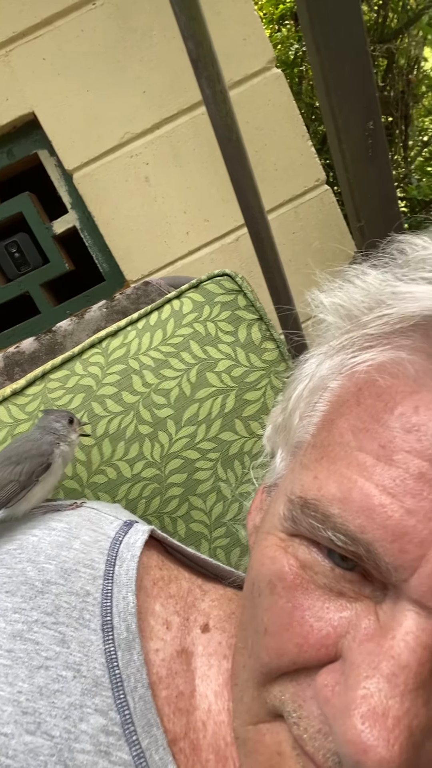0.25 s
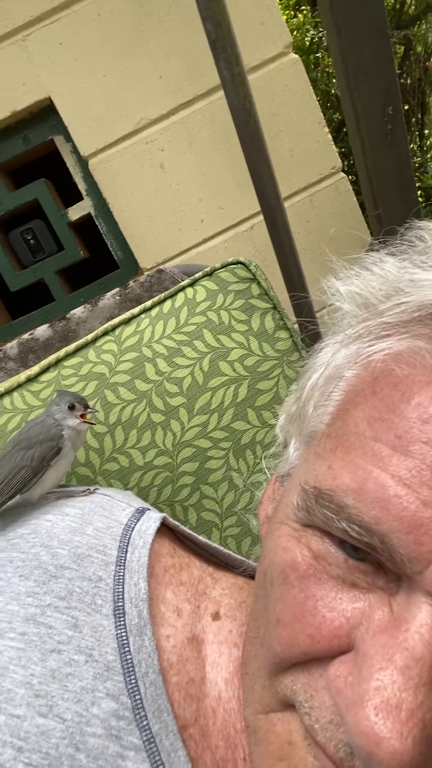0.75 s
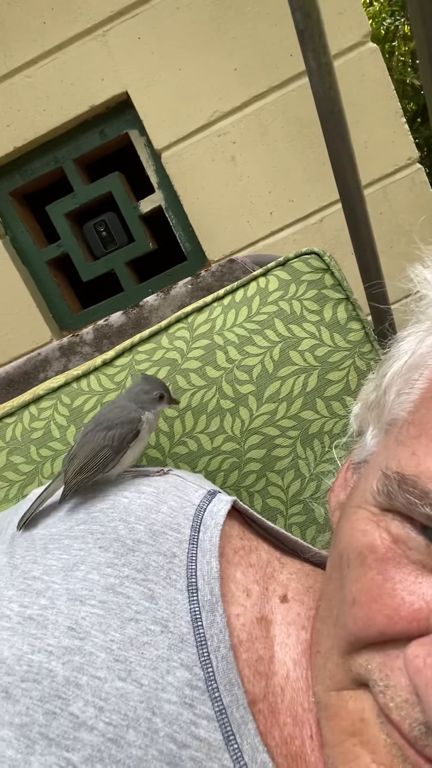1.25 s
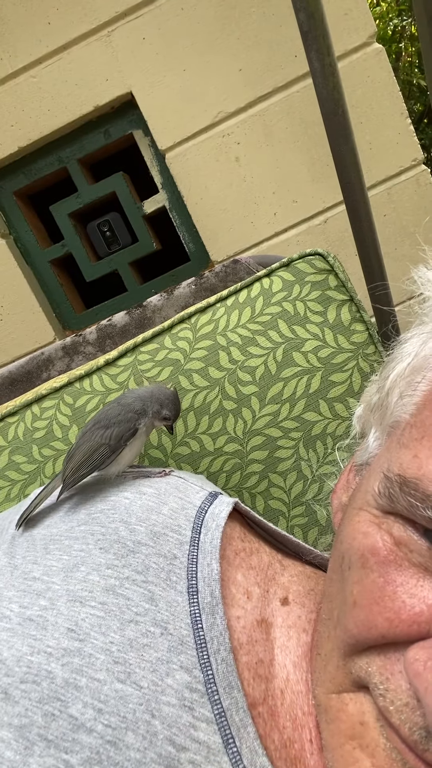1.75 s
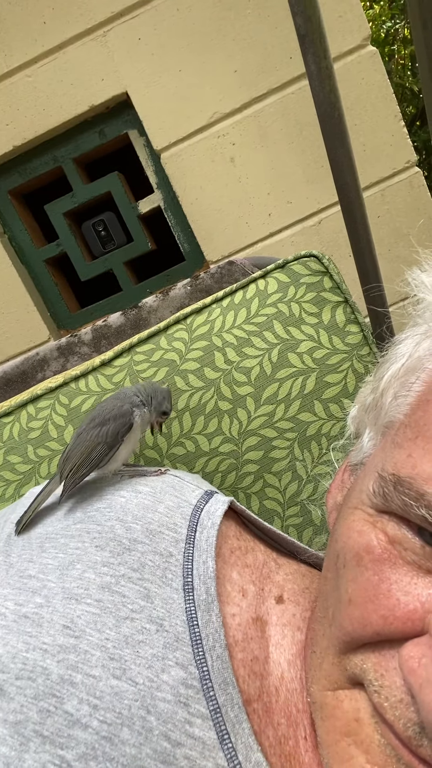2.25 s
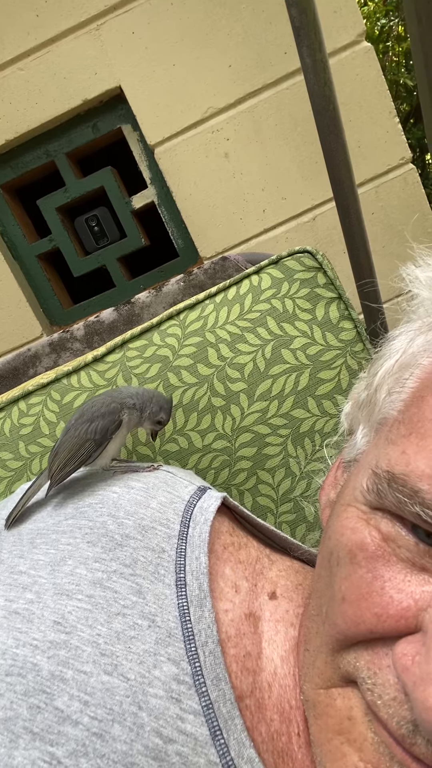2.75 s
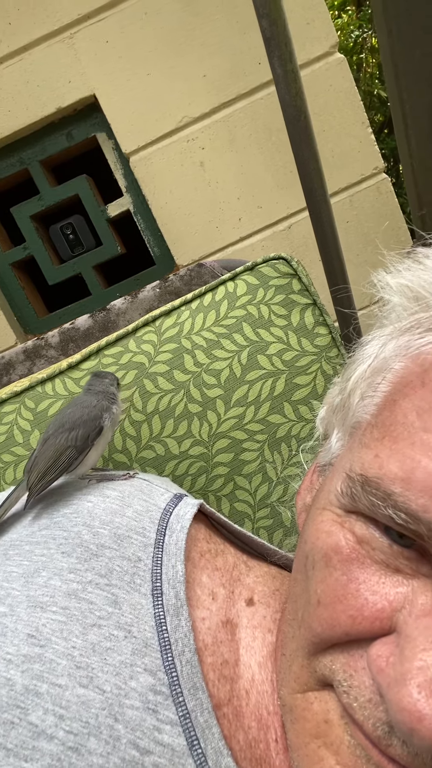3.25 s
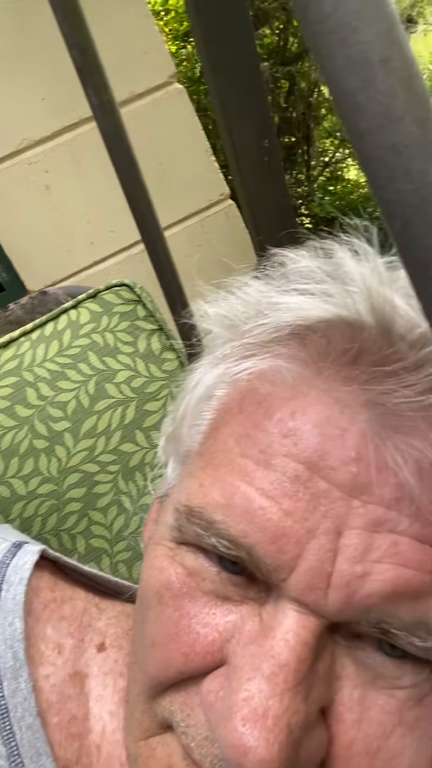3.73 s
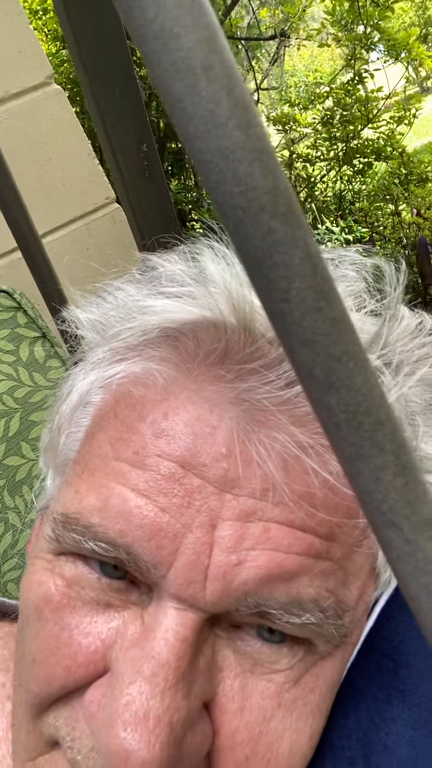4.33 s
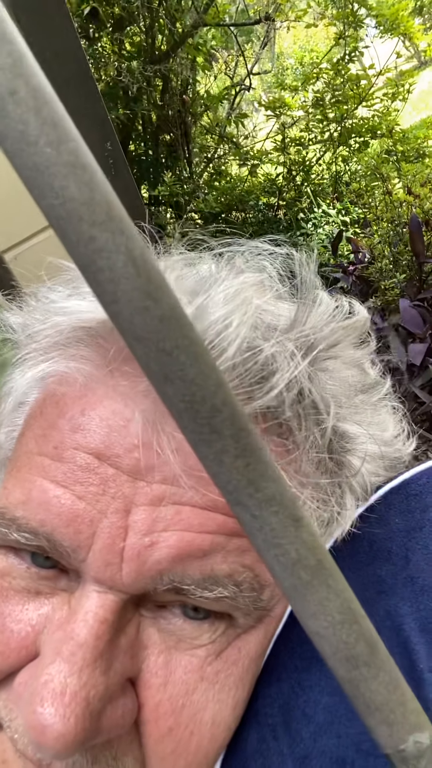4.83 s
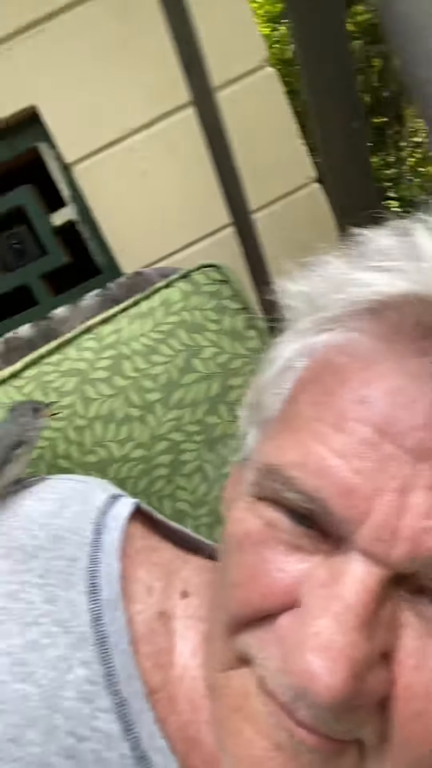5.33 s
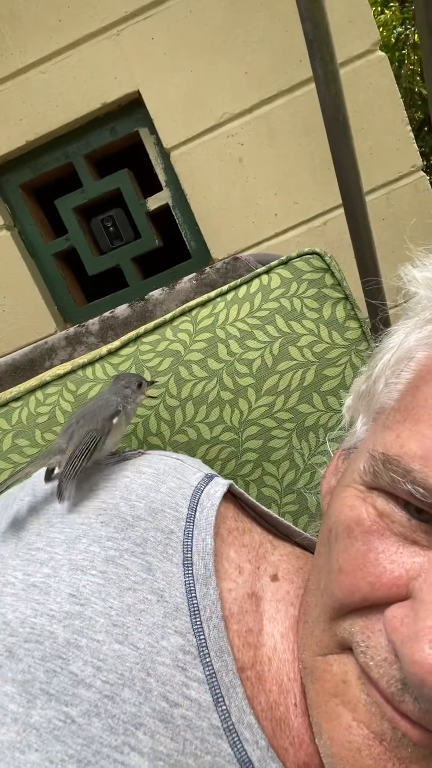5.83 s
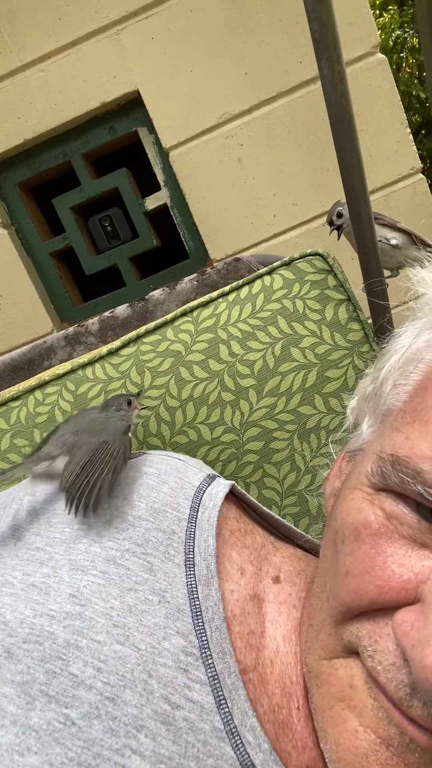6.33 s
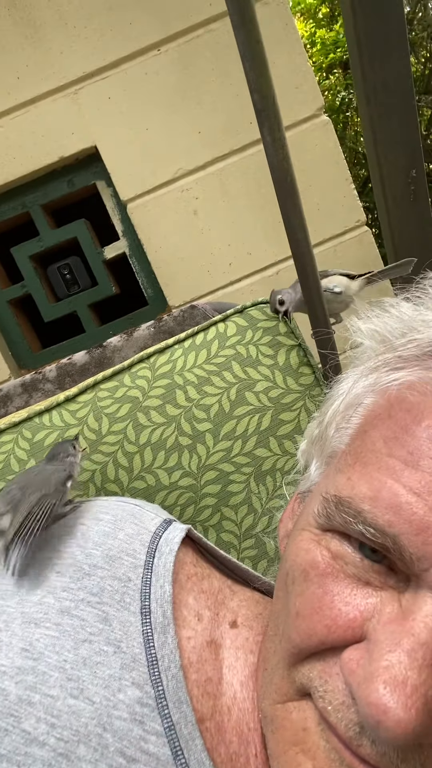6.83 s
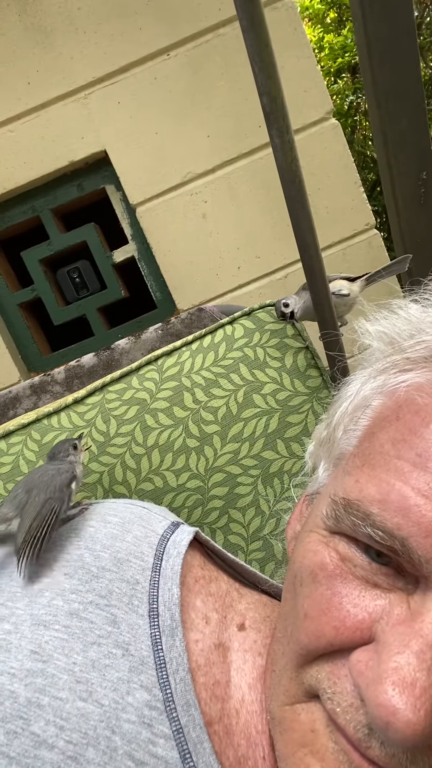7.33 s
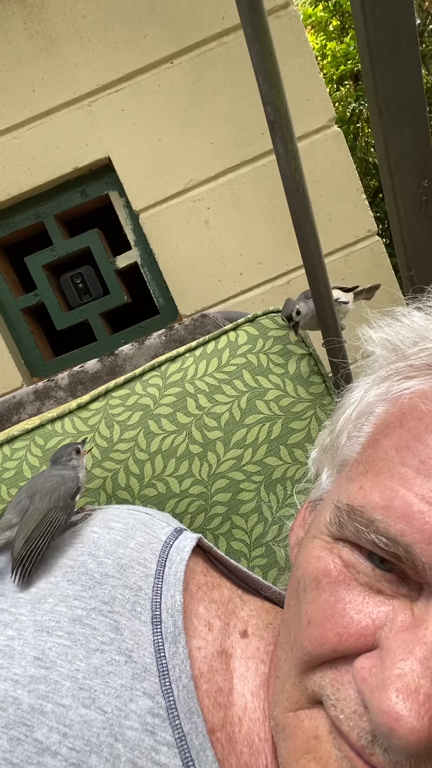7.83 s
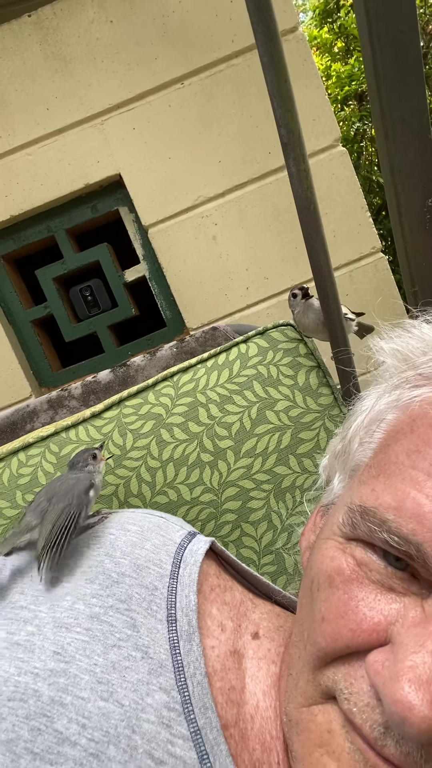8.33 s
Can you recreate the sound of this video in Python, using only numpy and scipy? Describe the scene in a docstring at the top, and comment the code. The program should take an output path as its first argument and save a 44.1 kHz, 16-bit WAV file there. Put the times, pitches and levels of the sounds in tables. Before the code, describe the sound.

On a quiet porch, titmice beg and scold near the microphone, with soft wing puffs, claw ticks and faint birds in the garden.

```python
"""On a porch, titmice beg and scold close to a two-port microphone.
A begging call is a whistle that sags and breaks into a falling rasp as two coupled syrinx sides mix.
Thin whistles hook downward; harsh scolds arch in pitch as a stack of harmonics frayed by noise.
Wings, claws and rustling feathers are shaped noise bursts; far birds glide and hiss in the garden,
over a faint low rumble of coloured noise."""
import sys
import numpy as np
from scipy import signal
from scipy.fft import rfft, irfft, next_fast_len
from scipy.io import wavfile
from scipy.ndimage import uniform_filter1d

SR = 44100
rng = np.random.default_rng(int(sys.argv[2]) if len(sys.argv) > 2 else 0)


def transcribe(signal):
    """Save signal, clipped to [-1, 1], as a 16-bit WAV file at the path in sys.argv[1]."""
    frames = np.atleast_2d(signal).T
    limited = np.clip(frames, -1, 1)
    pcm = np.round(limited * 32767).astype(np.int16)
    wavfile.write(sys.argv[1], SR, pcm)


N = 378378  # length in samples

# Garden air, noise colour: [f/Hz, relative spectral level/dB]
AIR = [(12, -50.5), (20, -47), (49, 1.5), (92, -4), (124, -5.5), (235, -19), (347, -18), (445, -28),
       (865, -20.5), (1210, -26), (1780, -23), (4820, -37.5), (6010, -67), (9110, -48), (15000, -62.5)]
# Likeness of the air at the two ports: [f/Hz, correlation/1]
AIR_SAME = [(60, 1), (130, 0.96), (290, 0.073), (640, 0), (3000, 0.05)]
AIR_DB = -55.5
# Level of the left port over the right for near sound: [f/Hz, level/dB]
PORT_BALANCE = [(50, -2), (300, 8.5), (900, 3.5), (2500, 1.5), (3400, 1.5), (4200, 3.5), (5000, -0.5),
                (6700, -0.6), (9000, 0)]
# Phase of the left port against the right, negative for a lag: [f/Hz, phase/rad]
PORT_PHASE = [(250, 0), (600, -1.3), (1100, -0.5), (2300, -0.6), (3050, -2), (3600, -1.07), (4250, -1.3),
              (4550, -2.5), (5400, -3), (7200, -4.5), (8600, -5), (10500, -6.5), (14500, -9)]
# Reverberation of the porch: [f/Hz, decay time T60/s]
PORCH_T60 = [(200, 0.2), (2000, 0.57), (4000, 0.26), (7500, 0.22), (14000, 0.26)]
EDGE_HZ = 15500  # upper band limit

# Thin hissy calls from the trees: [t/s, base level/dB, decay time T60/s]
FAR_HISSES = [(1.235, -60.5, 0.88), (3.534, -57.5, 0.6), (4.151, -49, 0.46), (5.521, -59, 0.78),
              (7.735, -57.5, 0.51)]
# Colour of those calls: [f/Hz, relative level/dB]
HISS_BAND = [(4800, -62), (5700, 12), (6800, 7.5), (7800, 9), (8150, 4.5), (8700, -49.5), (14000, -17),
             (15500, -40)]
# Far gliding whistles: [t/s, length/s, start f/Hz, end f/Hz, base level/dB]
FAR_WHISTLES = [(1.91, .19, 4700, 4050, -68), (7.06, .13, 5200, 2900, -69), (7.18, .22, 2080, 2170, -68),
                (7.43, .11, 5200, 2900, -65), (7.53, .25, 2000, 2170, -63), (7.79, .12, 5200, 2850, -66),
                (7.89, .19, 1920, 2090, -63), (8.14, .09, 5300, 3700, -65)]
FAR_ARCH = .025  # share by which the pitch rises in mid-note

# Wing beats: [t/s, air push base level/dB, feather swish base level/dB]
WINGBEATS = [(4.518, -40.5, -50), (4.551, -38.5, -48), (4.598, -41, -51), (4.641, -43.5, -48.5),
             (4.68, -42.5, -54), (4.801, -41.5, -48), (4.84, -62, -72), (5.033, -47.5, -54),
             (5.064, -49, -55.5), (5.204, -49, -55.5), (5.249, -51.5, -53), (5.802, -46.5, -53),
             (5.846, -47, -45.5), (5.883, -44, -48.5), (5.908, -41.5, -46), (5.929, -49, -72.5),
             (8.429, -46.5, -54.5)]
# Colour of the air push: [f/Hz, relative level/dB]
PUSH = [(20, -28), (40, -4), (70, 0), (150, -5), (260, -13), (600, -46)]
# Colour of the feather swish: [f/Hz, relative level/dB]
SWISH = [(120, -5), (300, 11.5), (900, 5), (2000, -4.5), (5000, -22.5), (12000, -40), (15000, -40)]
# Feathers and cloth as the birds shift, one level curve per rustle: [t/s, base level/dB]
RUSTLES = [
    [(4.5, -78), (4.816, -73), (4.82, -53)],
    [(5.29, -71), (5.67, -63), (5.7, -81)],
    [(8.39, -57), (8.522, -57.5), (8.57, -69)],
]
# Claws and beaks: [t/s, base level/dB]
TICKS = [(0.042, -62.5), (0.6848, -54), (1.6117, -54.5), (1.6716, -53.5), (4.5268, -52), (4.774, -48.5),
         (5.374, -52), (5.5255, -47.5), (5.6191, -51), (5.9068, -40.5), (6.7789, -59), (8.4311, -38)]
# Colour of ticks and rustles: [f/Hz, relative level/dB]
TICK_COLOUR = [(800, -2.5), (3000, -2.5), (6000, -5.5), (9000, 4.5), (13000, 1), (15500, -11)]

# Begging calls: [t/s, whistle length/s, fall length/s, swell/s, rasp lead before the break/s,
# upper start f/Hz, upper end f/Hz, lower top f/Hz, lower end f/Hz, plunge/1 (1 even, more = steep at first),
# whistle level/dB, upper voice level after the break/dB, flare/dB, lower voice level/dB, rasp base level/dB,
# octave lock/1, share of the fall at which it locks/1, treble/dB]
SWEEPS = [ (0.187, 0.089, 0.16, 0.015, 0.037, 7195, 2803, 2614, 1382, 1.5, -25, -34, 21, -40.5, -36.5, 0.49, 0.24, 0),
          (0.695, .100, .117, .006, 0.011, 7430, 2930, 2348, 1486, 2.2, -20, -31, 23.5, -47.5, -35, 0.094, 0.29, -3),
          (1.328, 0.032, 0.15, .005, .027, 6464, 3037, 2705, 1962, .95, -28.5, -26, -6, -41.5, -41, .9, .33, -1.5),
          (2.252, .074, 0.16, 0.007, 0.027, 6960, 2777, 2480, 1459, 1.4, -29.5, -27.5, -17, -44, -38, 1, 0.49, -2),
          (2.968, .068, 0.16, 0.0071, .036, 7030, 3070, 2860, 1507, 1.25, -25.5, -32, -15, -39.5, -42.5, 0.7, 0.19, -1),
          (3.725, 0.11, 0.13, 0.057, 0.049, 7300, 2975, 2600, 1510, 2.1, -20, -27, 17, -43, -37, .2, .3, -2),
          (4.822, .058, 0.19, 0.022, .04, 6790, 2610, 2684, 1327, 1.9, -25, -33, 14.5, -42.5, -34.5, .45, 0.24, 4),
          (6.283, .07, 0.12, 0.032, 0.059, 6990, 3070, 2800, 1552, 0.88, -38, -34, 9.5, -38.5, -37, 0.95, .2, 5),
          ]
# Thin whistles with a downward hook: [t/s, length/s, start f/Hz, sag/(Hz/s), hook depth/Hz, level/dB,
# softer start/dB, undertone level/dB, raspy ending/s, rasp base level/dB]
WHISTLES = [ (5.728, 0.16, 7673, 7800, 1700, -21.5, -22, -85, 0.059, -38.5),
            (7.276, 0.1, 7590, 1000, 524, -30, -12.5, -89.5, .01, -79),
            (7.436, .123, 7660, 7610, 1340, -25.5, -18.5, -90, 0.02, -41),
            (8.063, 0.088, 7185, 9040, 150, -28.5, -11, -45.5, 0.055, -42), ]
# Harsh scolds: [t/s, length/s, crest after start/s, start f/Hz, crest f/Hz, end f/Hz, lower end f/Hz,
# upper level/dB, lower level/dB, rasp base level/dB, beak opening/1, treble/dB]
CHURRS = [ (5.119, 0.16, 0.13, 3016, 3975, 3720, 2444, -31.5, -40.5, -34.5, 0.02, 1.5),
          (5.959, 0.13, .075, 3485, 4140, 3810, 2560, -41.5, -65, -36.5, 0.06, 0.5),
          (6.526, 0.14, .095, 3154, 3795, 3660, 2410, -42.5, -55, -36, 0.14, 0.5),
          (8.209, 0.16, 0.051, 3797, 3985, 2927, 1300, -38.5, -44.5, -35.5, 1, 5.5), ]
# Throat with the beak wide open: [f/Hz, relative level/dB]
SWEEP_THROAT = [(500, -34), (1200, -22), (1700, -10), (3000, -10), (3900, 2), (5400, -14), (6300, -2.5),
                (7200, 0.5), (8600, 1.5), (9700, -6.5), (11000, -7.5), (13200, -10.5), (15500, -34)]
# Throat with the beak half shut: [f/Hz, relative level/dB]
CHURR_THROAT = [(500, -33.5), (1200, -21.5), (1700, -2.5), (2600, -6), (3100, 0), (3900, -1), (5000, -25.5),
                (6300, -12.5), (7200, -3), (8200, -9), (11000, -11), (13200, -22), (15500, -43.5)]
# Overtones of the upper voice by its pitch: [f/Hz, level/dB]
OVERTONES = [(2900, -18.5), (3500, -3), (4100, 0.5), (4700, -7.5), (5300, -17.5), (6200, -18), (7000, -0.5),
             (7600, 7)]
# Combination tones in the rasp: [multiple of upper/1, multiple of lower/1, relative level/dB]
MIXTURES = [(1, 0, 2), (2, 0, 2), (3, 0, -1), (0, .5, -2), (0, 1, -1), (0, 2, -2), (0, 3, -1), (0, 4, -1),
            (1, 1, -2), (1, 2, -3), (2, 1, -2), (3, 1, -3), (1, -1, -4)]
# Nine harmonics of a scold, the third on the upper voice: [multiple of upper/1, of lower/1, relative level/dB]
CHURR_STACK = [(k / 3, 0, 0) for k in range(1, 10)]
# Treble boost of a call: [f/Hz, share of the boost/1]
TREBLE_SHELF = [(8000, 0), (11000, 1)]

# Whistle and break: at BREAK_HZ the syrinx slackens and both voices fall
BREAK_HZ, BREAK_S = 6184, .025
SAG_CURVE = 1.25  # above 1 the whistle holds its pitch a moment before it sags
# The lower voice scoops up from a flatter, softer entry and is steady LOWER_SETTLED_S after the break
LOWER_ENTRY_S, LOWER_SCOOP, LOWER_ENTRY_DB, LOWER_SETTLED_S = .055, .11, -36.5, .022
LOWER_LAG = 2.2  # power of the slackening: the lower voice falls later
LOWER_SLOPE_DB = -2.5  # change per overtone of the lower voice
# Level changes at the start of the whistle, then at the end of the fall
SWELL_DB, UPPER_FADE_DB, LOWER_FADE_DB, RASP_FADE_DB = -11, -21.5, -5, 1
RELEASE_S, RELEASE_DB = .022, -7.5
RASP_RISE_DB_PER_S, RASP_REST_DB = 1097.5, -38.5  # the rasp grows out of a faint breathiness
FRAY_AT_HZ = 4000  # pitch at which a rasp band has its nominal width
# The upper voice flares at the throat's resonance, mostly in its overtones
FLARE_HZ, FLARE_WIDTH_HZ, FLARE_BODY = 3980, 320, 0.31
# Octave lock: width as a share of the fall, firmness; rasp reduction and gains of the voices while locked
LOCK_WIDTH, LOCK_PULL = .17, .85
CLEAR_DB, LOCK_LOWER_DB, LOCK_UPPER_DB = 11, 2.5, 5
WHISTLE_SWELL_S, HOOK_S, HOOK_DB, UNDERTONE_DB_PER_S = .07, .014, -20, -300
# Scolds: rasp and voices at the start; voices at the end
CHURR_SWELL_DB, CHURR_TONE_SWELL_DB, CHURR_FADE_DB = -13.5, -21, -7.5


def amp(db):
    """Level to amplitude: 20 dB is a factor of ten."""
    return 10 ** (np.asarray(db) / 20)


def unit(x):
    """Normalization to an rms of 1."""
    return x / np.sqrt(np.mean(x ** 2) + 1e-20)


def ramp(x):
    """Saturation: holds a control between 0 and 1."""
    return np.clip(x, 0, 1)


def read(points, hz):
    """Interpolation of a table on a log-frequency axis."""
    f, value = np.transpose(points)
    return np.interp(np.log(hz + 1), np.log(f + 1), value)


def bins(n):
    """Discrete frequencies in Hz of an n-sample spectrum."""
    return np.fft.rfftfreq(n, 1 / SR)


def noise(n, colour):
    """Spectral shaping: white noise weighted by a colour, at rms 1."""
    spectrum = rfft(rng.standard_normal(n))
    return unit(irfft(spectrum * amp(read(colour, bins(n))), n))


def wander(n, hz):
    """Low-pass random modulation of rms 1, mostly slower than hz."""
    size = next_fast_len(n)
    spectrum = rfft(rng.standard_normal(size))
    slow = irfft(spectrum / (1 + (bins(size) / hz) ** 4), size)
    return unit(slow[:n])


def fuzz(n, hz):
    """Random complex modulation: broadens a line into a band about hz wide on each side."""
    return wander(n, hz) + 1j * wander(n, hz)


def add(mix, s, sound):
    """Superposition: adds a sound at time s in seconds."""
    part = mix[max(round(s * SR), 0):][:len(sound)]
    part += sound[:len(part)]


def air(left_db=1.7):
    """Partial coherence: low rumble shared by both ports, with a diffuse hush above it."""
    left, independent = rfft(noise(N, AIR)), rfft(noise(N, AIR))
    same = np.clip(read(AIR_SAME, bins(N)), -1, 1)
    right = same * left + np.sqrt(1 - same ** 2) * independent
    pair = irfft([left, right], N)
    level = amp(AIR_DB + .8 * wander(N, 4.6))
    return level * pair * amp([[left_db], [-left_db]])


def porch(x):
    """Reverberation: sparse reflections decay band by band, different at each port."""
    shape = (2, SR // 2)
    taps = rng.standard_normal(shape) * (rng.random(shape) < .06)
    taps[:, :SR // 250] = 0  # no reflection in the first 4 ms
    hz, t, z = signal.stft(taps, SR, nperseg=256)
    decay = amp(-60 * t / read(PORCH_T60, hz)[:, None])
    tail = signal.istft(z * decay, SR, nperseg=256)[1]
    return signal.fftconvolve(x[None], tail / np.linalg.norm(tail[0]), axes=1)[:, :N]


def ports(x):
    """Interaural-like phase and level: the left port lags and is fuller around 300 Hz."""
    hz, z = bins(N), rfft(x)
    half_balance = amp(read(PORT_BALANCE, hz) / 2)
    left = z * half_balance * np.exp(1j * read(PORT_PHASE, hz))
    return irfft([left, z / half_balance], N)


def far_hisses():
    """Scattering: the trees smear buzzy high notes into an exponentially fading hiss."""
    out, t = np.zeros(N), np.arange(SR // 2) / SR
    for s, db, t60 in FAR_HISSES:
        envelope = amp(db - 60 * t / t60) * np.minimum(t / 0.0064, 1)
        add(out, s, envelope * noise(len(t), HISS_BAND))
    return out


def far_whistles():
    """Frequency and amplitude modulation: arched slurs fade in and out on their way through the leaves."""
    out = np.zeros(N)
    for s, length, start_hz, end_hz, db in FAR_WHISTLES:
        n = int(length * SR)
        arch = 1 + FAR_ARCH * np.sin(np.linspace(0, np.pi, n))
        hz = np.linspace(start_hz, end_hz, n) * arch * (1 + .012 * wander(n, 90))
        envelope = amp(db + 2 * wander(n, 30)) * signal.windows.tukey(n, .5)
        add(out, s, envelope * np.sin(2 * np.pi * np.cumsum(hz) / SR))
    return out


def wings(push_db=2.0, swish_db=3, push_t60=0.22, swish_t60=0.12):
    """Flow noise: each downstroke pushes air at the microphone and swishes the feathers."""
    out, t = np.zeros(N), np.arange(SR // 5) / SR
    for s, push, swish in WINGBEATS:
        puff = amp(push + push_db - 60 * t / push_t60) * noise(len(t), PUSH)
        feathers = amp(swish + swish_db - 60 * t / swish_t60) * noise(len(t), SWISH)
        add(out, s, (puff + feathers) * np.minimum(t / 0.0051, 1))
    return out


def rustle(rustle_db=-3.0, grain_db=3):
    """Friction noise: fine uneven scratching of feathers on cloth."""
    out = np.zeros(N)
    for rows in RUSTLES:
        s, db = np.transpose(rows)
        t = np.arange(s[0], s[-1], 1 / SR)
        grain = amp(grain_db * wander(len(t), 150))
        scratch = unit(noise(len(t), TICK_COLOUR) * grain)
        level = amp(np.interp(t, s, db) + rustle_db)
        add(out, s[0], level * scratch * signal.windows.tukey(len(t), .1))
    return out


def claws(tick_db=-5.5, tick_t60=0.026, scrape_db=-16, scrape_t60=0.28):
    """Impact and friction: a dry tick decays fast, a short scrape on cloth more slowly."""
    out, t = np.zeros(N), np.arange(SR // 8) / SR
    for s, db in TICKS:
        fall = amp(-60 * t / tick_t60) + amp(scrape_db - 60 * t / scrape_t60)
        add(out, s, amp(db + tick_db) * fall * noise(len(t), TICK_COLOUR))
    return out


def beak(opening, treble_db):
    """Vocal-tract filter: half shut (0) to wide open (1), brighter when the bird faces the microphone."""
    hz = np.union1d(np.transpose(SWEEP_THROAT)[0], np.transpose(CHURR_THROAT)[0])
    wide = ramp(opening)
    db = wide * read(SWEEP_THROAT, hz) + (1 - wide) * read(CHURR_THROAT, hz)
    return np.column_stack([hz, db + treble_db * read(TREBLE_SHELF, hz)])


def rasp_onset(t, onset_s):
    """Onset of chaos: level in dB of a rasp that reaches full strength at onset_s."""
    return np.clip((t - onset_s) * RASP_RISE_DB_PER_S, RASP_REST_DB, 0)


def churr(length, crest_s, start_hz, crest_hz, end_hz, low_hz, voice_db, low_db, rasp_db, bright_db=-11):
    """Pitch arch: two voices, a fifth apart up to the crest, swell and then move to their own end pitches."""
    t = np.arange(0, length, 1 / SR)
    rising = ramp(1 - t / crest_s) ** 2  # 1 at the start, 0 from the crest on
    sinking = np.sin(np.pi / 2 * ramp((t - crest_s) / (length - crest_s))) ** 2
    arch_hz = crest_hz + (start_hz - crest_hz) * rising
    upper_hz = arch_hz + (end_hz - crest_hz) * sinking
    lower_hz = arch_hz * 2 / 3 * (1 - sinking) + low_hz * sinking
    tone_db = CHURR_TONE_SWELL_DB * rising + CHURR_FADE_DB * sinking
    chaos_db = rasp_db + CHURR_SWELL_DB * rising
    return upper_hz, lower_hz, voice_db + tone_db, low_db + tone_db, bright_db, chaos_db


def whistle(length, start_hz, sag_hz_per_s, hook_hz, db, soft_db, under_db, raspy_s, rasp_db):
    """Frequency glide: a whistle swells, sags and hooks down; an undertone an octave below fades."""
    t = np.arange(0, length, 1 / SR)
    hook = np.exp((t - length) / HOOK_S)
    hz = start_hz - sag_hz_per_s * t - hook_hz * hook
    upper_db = db + soft_db * ramp(1 - t / WHISTLE_SWELL_S) ** 2 + HOOK_DB * hook
    lower_db = under_db + UNDERTONE_DB_PER_S * t
    chaos_db = rasp_db + rasp_onset(t, length - raspy_s)
    return hz, hz / 2, upper_db, lower_db, read(OVERTONES, hz), chaos_db


def sweep(whistle_s, fall_s, swell_s, lead_s, start_hz, end_hz, top_hz, low_hz, plunge,
          whistle_db, voice_db, flare_db, low_db, rasp_db, locking, lock_at):
    """Tension and mode locking: a whistle breaks, slackening lowers both voices, an octave attracts them."""
    t = np.arange(0, whistle_s + fall_s, 1 / SR)
    slack = 1 - (1 - ramp((t - whistle_s) / fall_s)) ** plunge
    broken = ramp((t - whistle_s) / BREAK_S + .5)
    entering = ramp((whistle_s + LOWER_SETTLED_S - t) / LOWER_ENTRY_S) ** 2
    release = RELEASE_DB * ramp(1 - (t[-1] - t) / RELEASE_S)

    sag_hz = (BREAK_HZ - start_hz) * ramp(t / whistle_s) ** SAG_CURVE
    upper_hz = start_hz + sag_hz + (end_hz - BREAK_HZ) * slack
    lower_hz = top_hz * (1 - LOWER_SCOOP * entering) + (low_hz - top_hz) * slack ** LOWER_LAG
    lock = ramp(locking) * broken * np.exp(-((slack - lock_at) / LOCK_WIDTH) ** 4)
    upper_hz = upper_hz + ramp(LOCK_PULL) * lock * (2 * lower_hz - upper_hz)

    flare = flare_db * np.exp(-((upper_hz - FLARE_HZ) / FLARE_WIDTH_HZ) ** 2)
    before_db = whistle_db + SWELL_DB * ramp(1 - t / swell_s)
    after_db = voice_db + UPPER_FADE_DB * slack + LOCK_UPPER_DB * lock
    upper_db = (1 - broken) * before_db + broken * after_db + FLARE_BODY * flare + release
    lower_db = low_db + LOWER_ENTRY_DB * entering + LOWER_FADE_DB * slack ** 2 + LOCK_LOWER_DB * lock + release
    bright_db = read(OVERTONES, upper_hz) + (1 - FLARE_BODY) * flare
    onset_db = rasp_onset(t, whistle_s - lead_s)
    chaos_db = rasp_db + onset_db - CLEAR_DB * lock + RASP_FADE_DB * slack ** 2 + release
    return upper_hz, lower_hz, upper_db, lower_db, bright_db, chaos_db


def call(upper_hz, lower_hz, upper_db, lower_db, bright_db, chaos_db,
         throat, mixtures, jitter, flutter, fray_hz, hiss_share, lower_slope_db, upper_slope_db, rasp_db, snap_db):
    """Nonlinear coupling: two syrinx sides share a throat; in chaos they mix and fray into a rasp."""
    n = len(upper_hz)
    age = np.arange(n) / SR
    chaos = amp(chaos_db) / (amp(chaos_db) + amp(upper_db) + amp(lower_db))

    def side(hz, db, overtone_db, slope_db, count):
        """Harmonic oscillator: phase and sound of one voice, less steady in chaos."""
        drift = .0008 * wander(n, 90) + .012 * chaos * wander(n, 70)
        hz = uniform_filter1d(hz, size=300) * (1 + drift + jitter * chaos ** 2 * wander(n, 450))
        phase = 2 * np.pi * np.cumsum(hz) / SR
        tone = np.sin(phase)
        for k in range(2, count + 1):
            gain_db = overtone_db + slope_db * (k - 2) + read(throat, k * hz) - read(throat, hz)
            strength = amp(gain_db + 2 * wander(n, 49)) * (k * hz < SR / 2)
            tone += strength * np.sin(k * phase + rng.uniform(0, 2 * np.pi))
        waver_db = (.7 + 3 * chaos) * wander(n, 50)
        return phase, amp(db + waver_db) * tone * (1 + flutter * chaos * wander(n, 500))

    upper_phase, upper = side(upper_hz, upper_db, bright_db, upper_slope_db, count=4)
    lower_phase, lower = side(lower_hz, lower_db, -5.5, lower_slope_db, count=6)

    # sum and difference tones: smeared bands that glide with the voices and come and go
    bands = np.zeros(n)
    for a, b, db in mixtures:
        band_hz = a * upper_hz + b * lower_hz
        strength = amp(db + 2.2 * wander(n, 25)) * (band_hz < SR / 2)
        width_hz = fray_hz * np.mean(band_hz) / FRAY_AT_HZ  # higher bands fray wider
        carrier = np.exp(1j * (a * upper_phase + b * lower_phase))
        bands += strength * (fuzz(n, width_hz) * carrier).real
    bands = unit(irfft(rfft(bands) * amp(read(throat, bins(n))), n))
    rasp = np.sqrt(1 - hiss_share) * bands + np.sqrt(hiss_share) * noise(n, throat)
    bursts = amp(2.2 * wander(n, 450))
    rasp = amp(chaos_db + rasp_db) * unit(rasp * bursts)

    # the valve opens with a small click and closes more gently
    snap = amp(upper_db[0] + snap_db - 60 * age / 0.0054) * noise(n, throat)
    gate = ramp(age / 0.00037) * ramp((age[-1] - age) / 0.008)
    return gate * (upper + lower + rasp + snap)


def titmice():
    """Source and filter: begging calls, hooked whistles and scolds, each through its beak opening."""
    out = np.zeros(N)
    sweep_grain = dict(jitter=.015, flutter=.5, fray_hz=130, hiss_share=.27, lower_slope_db=LOWER_SLOPE_DB,
                       upper_slope_db=-14.0, rasp_db=0.5, snap_db=-15.0)
    whistle_grain = dict(jitter=.018, flutter=.55, fray_hz=170, hiss_share=.7, lower_slope_db=LOWER_SLOPE_DB,
                         upper_slope_db=-13.0, rasp_db=0.5, snap_db=0.5)
    churr_grain = dict(jitter=.015, flutter=.6, fray_hz=140, hiss_share=.33, lower_slope_db=-15,
                       upper_slope_db=-12, rasp_db=-1, snap_db=-26)
    for s, *row, treble_db in SWEEPS:
        add(out, s, call(*sweep(*row), beak(0.99, treble_db), MIXTURES, **sweep_grain))
    for s, *row in WHISTLES:
        add(out, s, call(*whistle(*row), beak(1, treble_db=2.5), MIXTURES, **whistle_grain))
    for s, *row, opening, treble_db in CHURRS:
        add(out, s, call(*churr(*row), beak(opening, treble_db), CHURR_STACK, **churr_grain))
    return out


def scene():
    """Direct-to-reverberant ratio: near birds almost dry, far birds with porch echo, over the garden air."""
    whistles, hisses = far_whistles(), far_hisses()
    trees = amp(1.0) * ports(hisses) + amp(-24) * porch(hisses)
    garden = amp(-5) * ports(whistles) + amp(-2) * porch(whistles)
    near = rustle() + claws() + titmice()
    birds = ports(near + wings()) + amp(-18.5) * porch(near)
    return air() + trees + garden + birds


def record(dry):
    """Band limitation: a linear-phase low-pass at EDGE_HZ."""
    lowpass = signal.firwin(401, EDGE_HZ, window=("kaiser", 9), fs=SR)
    return signal.oaconvolve(dry, lowpass[None], "same")


dry = scene()
out = record(dry)
transcribe(out)
```